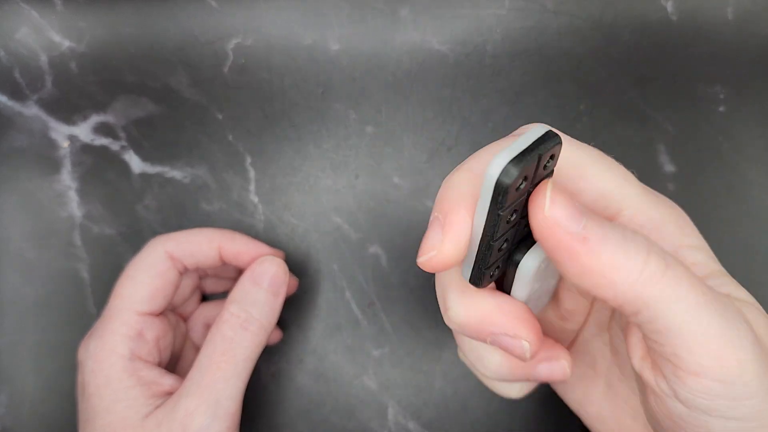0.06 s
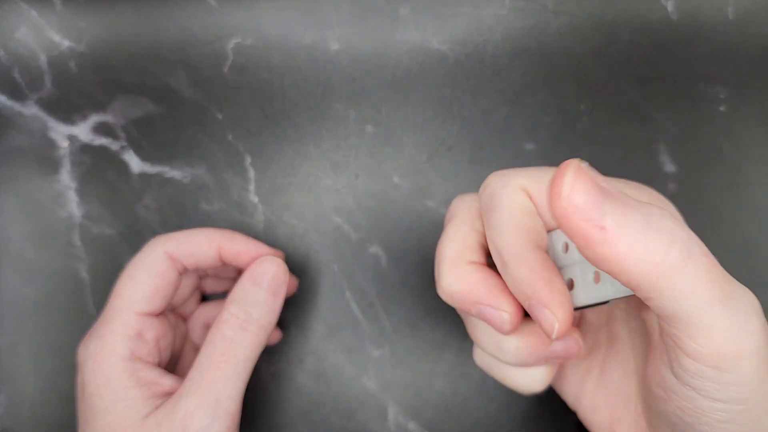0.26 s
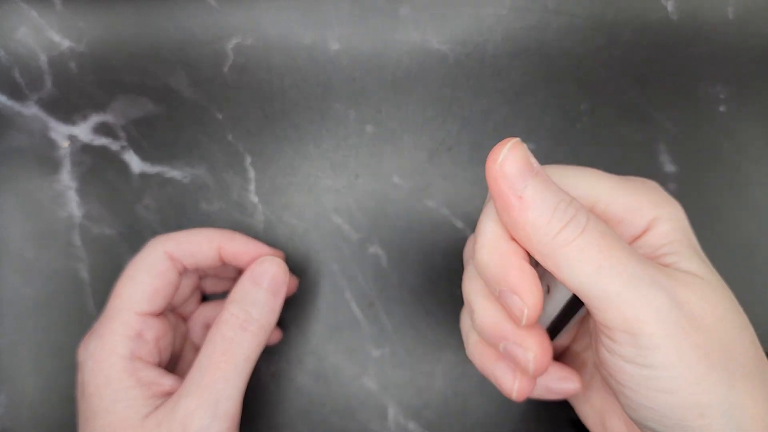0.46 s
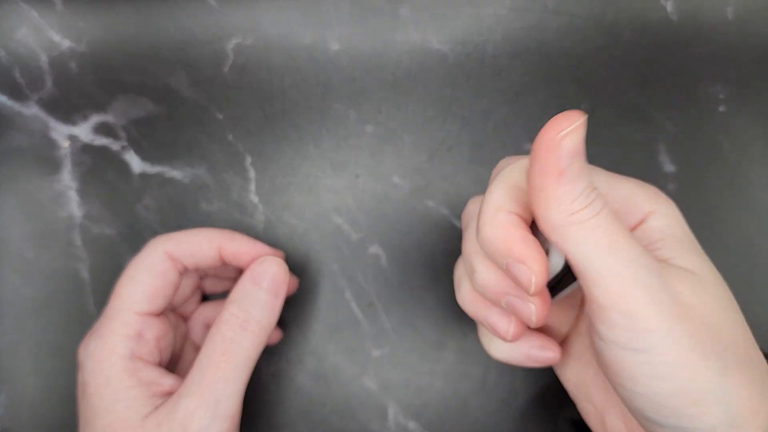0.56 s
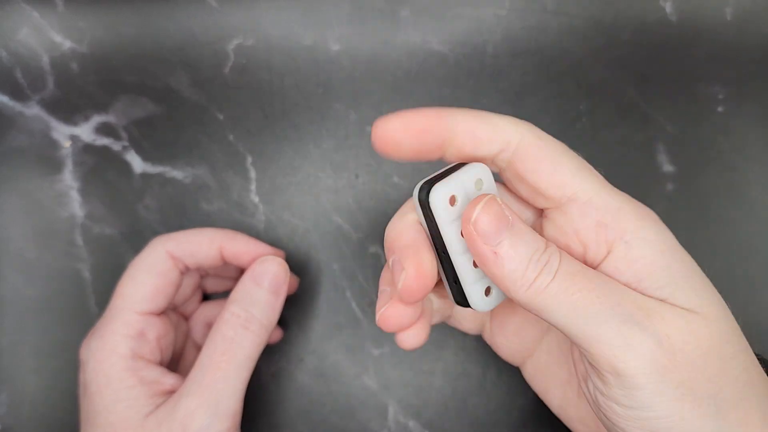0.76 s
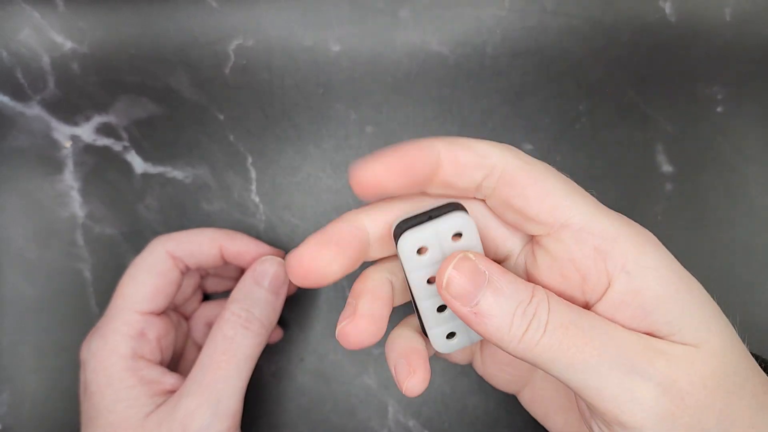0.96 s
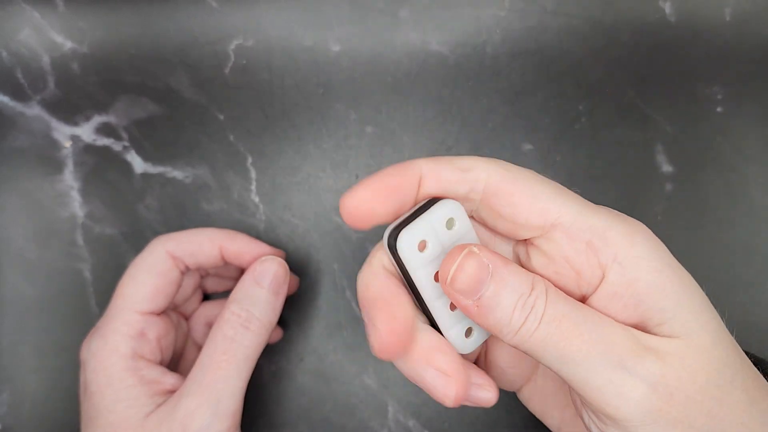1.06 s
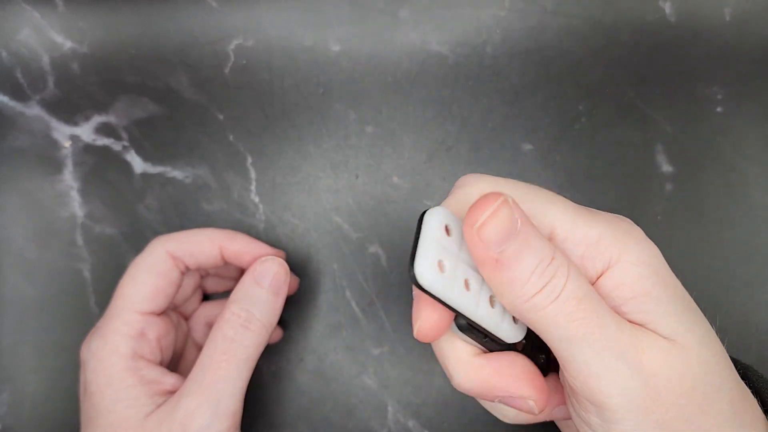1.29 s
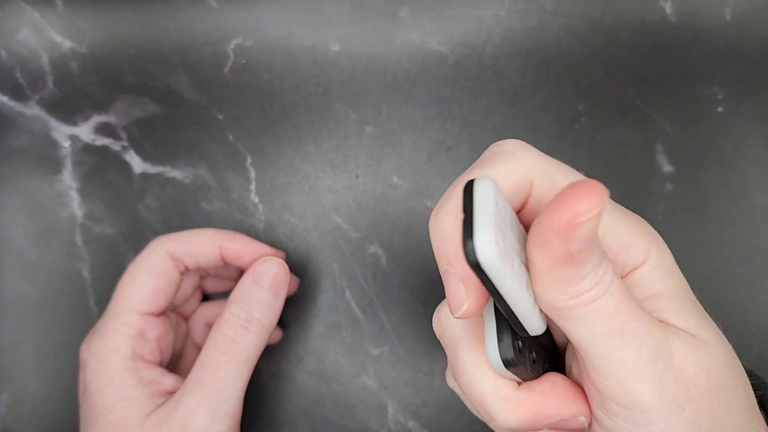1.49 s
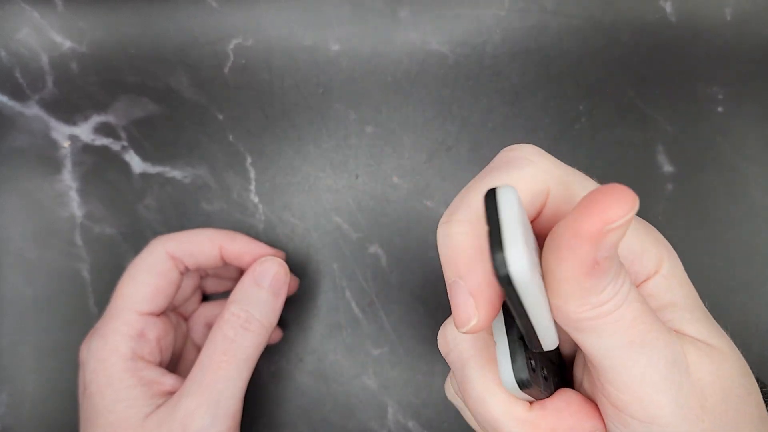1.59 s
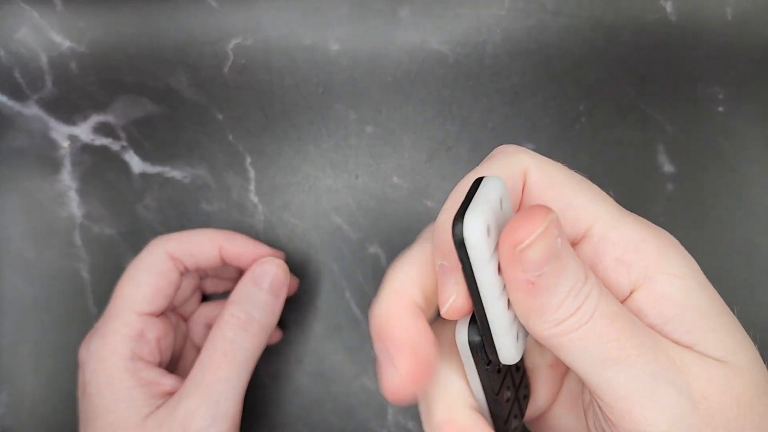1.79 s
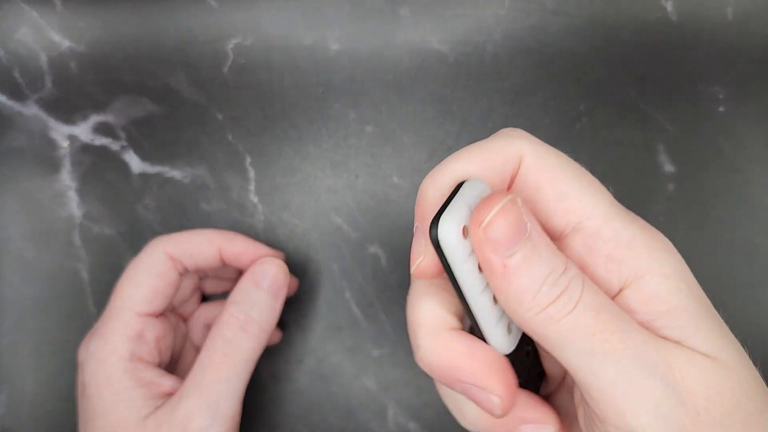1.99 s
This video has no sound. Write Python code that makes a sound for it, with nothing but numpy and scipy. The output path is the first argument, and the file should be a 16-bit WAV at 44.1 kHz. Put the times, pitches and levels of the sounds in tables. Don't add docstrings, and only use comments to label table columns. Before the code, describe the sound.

A magnetic plastic slider snaps sharply in the hand at about 0.22, 0.33 and 0.38 seconds, each snap led by a brief quickening scrape, with a tiny tick just before the third. Fingers rub faintly on plastic. From 1.06 to 1.4 seconds come much softer, palm-muffled clicks, mostly left, another at 1.67 and a firmer one at 2.04. Close stereo, quiet room, distant low hum throughout.

```python
import sys
import numpy as np
from scipy import signal
from scipy.fft import rfft, irfft
from scipy.io import wavfile
from scipy.ndimage import uniform_filter1d

SR = 44100
rng = np.random.default_rng(int(sys.argv[2]) if len(sys.argv) > 2 else 0)


def wav_out(sig):
    wavfile.write(sys.argv[1], SR, np.round(np.clip(np.atleast_2d(sig).T, -1, 1) * 32767).astype(np.int16))


def volts_from_decibels(level):
    exponent = np.asarray(level, float) / 20
    return 10 ** exponent


N = 90404


def rms_one(x):
    return x / np.sqrt(np.mean(x ** 2) + 1e-20)


def at_hz(points, hz):
    points_hz, points_db = np.array(points).T
    return np.interp(np.log(hz), np.log(points_hz), points_db)


def sides(left_right_db):
    return volts_from_decibels(np.array([[min(left_right_db, 0)], [min(-left_right_db, 0)]]))


def butter(x, order, hz, kind="low"):
    return signal.sosfilt(signal.butter(order, hz, kind, fs=SR, output="sos"), x)


def resonate(x, hz, width_hz):
    r = np.exp(-np.pi * width_hz / SR)
    zeros = np.array([1, 0, -1]) * (1 - r * r) / 2
    poles = [1, -2 * r * np.cos(2 * np.pi * hz / SR), r * r]
    return signal.lfilter(zeros, poles, x)


def add(out, i, x):
    out[:, i:i + x.shape[1]] += x


# hz [Hz], side_minus_mid_db [dB]
SIDENESS = [(60, -19), (130, -17.5), (290, -2), (640, -4.5), (1410, 2.5), (3100, -1), (6820, 2), (15000, 5)]


def widen(mid, side, hz):
    return mid + volts_from_decibels(at_hz(SIDENESS, hz)) * side * [[1], [-1]]


# hz [Hz], density_db [dB per Hz]
AIR_LOW = [(12, -14), (28, 0.5), (45, -5), (85, -3), (105, -8), (125, 0), (190, 0), (250, -8), (275, -21),
           (330, -15.5), (400, -50.5)]
AIR_MID = [(190, -61), (320, -13), (346, -6.5), (420, -6.5), (454, -8.5), (581, -5), (692, -12.5),
           (1420, -16), (2600, -31), (3380, -78.5), (5720, -120)]
AIR_HIGH = [(1700, -33), (2600, -5), (4500, -11), (8000, -21.5), (9300, -32.5), (10800, -40), (12000, -31),
            (15800, -33)]
AIR_LOW_DB, AIR_MID_DB, AIR_HIGH_DB = -50.5, -58.5, -78.5
# hz [Hz], left_right_db [dB]
TILT = [(60, 0), (130, 4), (290, 0), (640, -2.5), (1410, -1.0), (3100, 0), (6820, 0.5), (15000, 16)]


def air(spectrum, level_db):
    hz = np.fft.rfftfreq(N, 1 / SR) + 1e-3
    inside = (hz >= spectrum[0][0]) & (hz < spectrum[-1][0])
    mid, side = rfft(rng.standard_normal((2, N)))
    both = widen(mid, side, hz) * volts_from_decibels(at_hz(TILT, hz) / 2 * [[1], [-1]])
    return volts_from_decibels(level_db) * rms_one(irfft(both * inside * volts_from_decibels(at_hz(spectrum, hz)), N))


HUM_HZ, HUM_DB, HUM_WOBBLE_DB = 59.2, -51.5, 1.1
# pitch_hz [Hz], width_hz [Hz], level_db [dB]
TONES = [(157.6, 2, -62), (273.6, 5.2, -66), (348.4, 24, -63.5), (447.4, 24, -69.5), (568.6, 1.4, -72.5),
         (1427, 15, -72.5)]


def hum():
    wobble = rms_one(resonate(rng.standard_normal(N), 16, 6))
    line = np.sqrt(2) * np.sin(2 * np.pi * HUM_HZ * np.arange(N) / SR)
    out = volts_from_decibels(HUM_DB + HUM_WOBBLE_DB * wobble) * line * np.ones((2, 1))
    for pitch_hz, width_hz, level_db in TONES:
        noise = rng.standard_normal((2, N + SR))
        mid, side = resonate(resonate(noise, pitch_hz, width_hz), pitch_hz, 3 * width_hz)[:, SR:]
        out = out + volts_from_decibels(level_db) * rms_one(widen(mid, side, pitch_hz))
    return out


# middle_s [s], length_s [s], level_db [dB]
RUBS = [(0.038, 0.04, -82), (0.165, 0.16, -79.5), (0.504, .06, -86), (0.643, .03, -77),
        (0.757, 0.053, -79.5), (0.882, 0.054, -79), (0.96, .05, -86), (1.133, .1, -81.5),
        (1.283, 0.23, -83), (1.437, .06, -87.5), (1.69, 0.059, -80.5), (1.785, 0.073, -75),
        (1.944, 0.085, -81), (2.026, .03, -79.5)]
RUB_TOP_DB = -6.5


def rubs():
    t = np.arange(N) / SR
    swell = np.zeros(N)
    for middle_s, length_s, level_db in RUBS:
        swell += volts_from_decibels(level_db) * np.exp(-((t - middle_s) / length_s * 2) ** 2)
    low = rms_one(butter(rng.standard_normal((2, N)), 3, [2600, 8300], "band"))
    top = rms_one(butter(rng.standard_normal((2, N)), 3, [11500, 16000], "band"))
    return swell * (low + volts_from_decibels(RUB_TOP_DB) * top)


def plates(force, modes, crack_db):
    out = volts_from_decibels(crack_db) * 0.13 * np.diff(force, prepend=0)
    for k, (hz, width_hz, level_db) in enumerate(modes):
        port_db = level_db + 1.8 * rng.standard_normal((2, 1))
        out = out + (-1) ** k * volts_from_decibels(port_db) * resonate(force, hz, width_hz)
    return butter(out, 2, 900, "high")


EARLY_DB, EARLY_T60_S, LATE_DB, LATE_T60_S = -17.5, 0.0632, -21.5, 0.24
ROOM_LOW_HZ, ROOM_HIGH_HZ = 2500, 8000


def room(modes, crack_db, ms):
    early, late = rms_one(plates(rng.standard_normal((2, 2, len(ms))), modes, crack_db))
    late = butter(butter(late, 1, [ROOM_LOW_HZ, ROOM_HIGH_HZ], "band"), 1, 13000)
    t = np.maximum(ms / 1000 - .003, 0)
    onset = np.clip(t / 0.0076, 0, 1)
    early = volts_from_decibels(EARLY_DB - 60 * t / EARLY_T60_S) * early
    late = volts_from_decibels(LATE_DB - 60 * t / LATE_T60_S) * late
    return onset * (early + late)


CHATTER_PER_S, CHATTER_DB_PER_MS = 9000, 2


def chatter(envelope_db):
    size = len(envelope_db)
    grains = (rng.random((3, size)) < CHATTER_PER_S / SR) * rng.standard_normal((3, size))
    return volts_from_decibels(envelope_db) * (grains[0] + 1.1 * grains[1:]) + 1e-18


SCRAPE_RIGHT_DB = -30
FIRST_BLOW_DB = 13
LEAD_SAMPLES, AFTER_SAMPLES = 1400, 10000


def strike(start_s, modes, crack_db, peak_db, scrape_db, rise_db_per_ms, hold_ms, room_db):
    ms = np.arange(-LEAD_SAMPLES, AFTER_SAMPLES) / SR * 1000
    hit_db = np.where(ms < 0, -200, -CHATTER_DB_PER_MS * np.maximum(ms - hold_ms, 0))
    body = plates(chatter(hit_db) + volts_from_decibels(FIRST_BLOW_DB) * (ms == 0), modes, crack_db)
    body = body / np.sqrt(uniform_filter1d(body ** 2, size=66).max(1, keepdims=True))
    scrape = rms_one(plates(chatter(0 * ms), modes, crack_db + 13))
    scrape = scrape * volts_from_decibels(np.where(ms < -.8, scrape_db + rise_db_per_ms * np.minimum(ms + 3, 0), -200))
    around = scrape * sides(-SCRAPE_RIGHT_DB) + volts_from_decibels(peak_db + room_db) * room(modes, crack_db, ms)
    return int(start_s * SR) - LEAD_SAMPLES, volts_from_decibels(peak_db) * body, around


# start_s [s], peak_db [dB], left_right_db [dB], ring_hz [Hz], other_ring_hz [Hz]
SOFT = [
    (1.064, -55, 13, 6460, 3930),
    (1.084, -67.5, 4.7, 6300, 7800),
    (1.176, -40, 13, 5070, 8070),
    (1.226, -38.5, 11, 3280, 6000),
    (1.328, -44.5, 26, 3210, 5000),
    (1.394, -50.5, 29.8, 2675, 7330),
    (1.673, -43.5, 15, 3125, 6400),
    (2.043, -34, 10.8, 5670, 2970),
    (2.044, -43.5, 7.6, 1460, 3200),
]
# hz [Hz], width_hz [Hz], level_db [dB]
PALM = [(980, 300, -9), (2300, 890, -8), (4730, 1300, -11), (7800, 1600, -3.5), (10200, 600, -22)]
SOFT_CRACK_DB, SOFT_HOLD_MS, SOFT_RING_DB, PALM_DB = -6, 3.4, 6.5, 1
PALM_CUT = 1.14


def soft_clicks(out):
    for start_s, peak_db, left_right_db, ring_hz, other_hz in SOFT:
        modes = [(hz, width_hz, level_db + PALM_DB) for hz, width_hz, level_db in PALM]
        modes += [(ring_hz, 500, SOFT_RING_DB), (other_hz, 450, SOFT_RING_DB - 5.0)]
        i, body, around = strike(start_s, modes, SOFT_CRACK_DB, peak_db, peak_db - 12, 1.7,
                                 SOFT_HOLD_MS, 0.054)
        click = body * sides(left_right_db) + around
        damped = butter(click, 4, PALM_CUT * max(ring_hz, other_hz))
        add(out, i, damped + volts_from_decibels(-18) * click)


# start_s [s], peak_db [dB], pitch_hz [Hz]
TICK = (.3782, -17, 5000)


def tick(out):
    start_s, peak_db, pitch_hz = TICK
    ring = np.zeros(400)
    ring[0] = 1
    ring = resonate(resonate(ring, pitch_hz, 1800), pitch_hz, 1800)
    add(out, int(start_s * SR), volts_from_decibels(peak_db) * ring / ring.max() * sides(-SCRAPE_RIGHT_DB))


# start_s [s], peak_db [dB], left_right_db [dB], scrape_db [dB], rise_db_per_ms [dB/ms]
SNAPS = [
    (.2235, -9.5, -3, -15, 1.66),
    (.3328, -9, 9, -19.5, 1.76),
    (.3800, -14.5, 12, -33, 2.5),
]
# hz [Hz], width_hz [Hz], level_db [dB]
GRIP_A = [(1510, 310, -10.5), (2058, 330, -16.5), (3000, 700, -10.5), (4200, 900, -4.5), (6600, 1700, -4),
          (8400, 1400, -3.5), (10400, 900, -3), (11820, 1200, 3.5), (14000, 400, -8), (15400, 800, -2.5)]
GRIP_B = [(1020, 340, -18.5), (1904, 240, -9.5), (3300, 350, 0), (5000, 650, -3.5), (6300, 900, 0),
          (9400, 1700, -7.5), (10210, 1400, -14), (12800, 2700, -1.5), (15865, 660, -7.5)]
GRIP_C = [(2030, 500, -5.5), (3380, 760, -7), (4406, 383, 6), (4950, 350, 3), (6350, 700, 0),
          (7800, 960, -5), (11000, 1270, -25.5), (12650, 610, -19.5), (14500, 1300, -12)]
HOLDS_MS = (1.8, .6, 0.29)
ROOM_SHARES_DB = (6, -0.5, -10)
CRACK_DB = 2


def hard_snaps(out):
    grips = (GRIP_A, GRIP_B, GRIP_C)
    for snap, modes, hold_ms, room_db in zip(SNAPS, grips, HOLDS_MS, ROOM_SHARES_DB):
        start_s, peak_db, left_right_db, scrape_db, rise_db_per_ms = snap
        i, body, around = strike(start_s, modes, CRACK_DB, peak_db, scrape_db, rise_db_per_ms,
                                 hold_ms, room_db)
        add(out, i, body * sides(left_right_db) + around)


LEFT_LEAD_S = 0.00013


def slider():
    out = np.zeros((2, N + SR // 4))
    soft_clicks(out)
    tick(out)
    hard_snaps(out)
    out = out[:, :N]
    out[1] = np.interp(np.arange(N) - LEFT_LEAD_S * SR, np.arange(N), out[1])
    return out


def scene():
    background = air(AIR_LOW, AIR_LOW_DB) + air(AIR_MID, AIR_MID_DB) + air(AIR_HIGH, AIR_HIGH_DB) + hum()
    return background + rubs() + slider()


def top_cut(x):
    return signal.sosfilt(signal.butter(12, 16510, fs=SR, output="sos"), x)


CUTOFF_HZ = 16300


def record(dry):
    cut = signal.sosfilt(signal.cheby2(14, 60, CUTOFF_HZ, fs=SR, output="sos"), dry)
    mix = np.clip(cut, -1, 1)
    return top_cut(mix)


dry = scene()
out = record(dry)
wav_out(out)
```